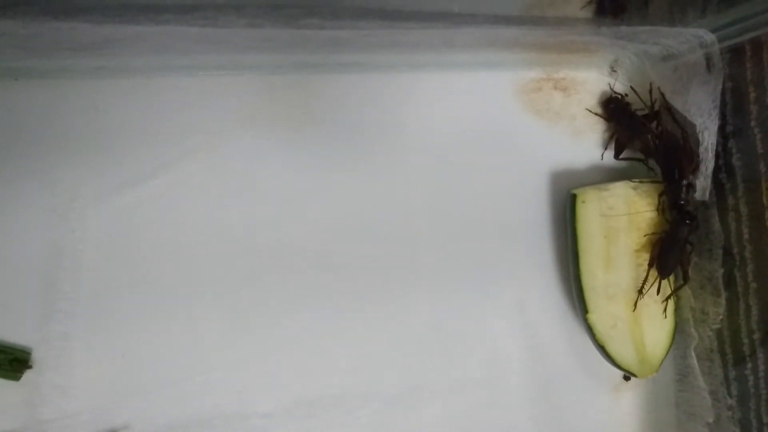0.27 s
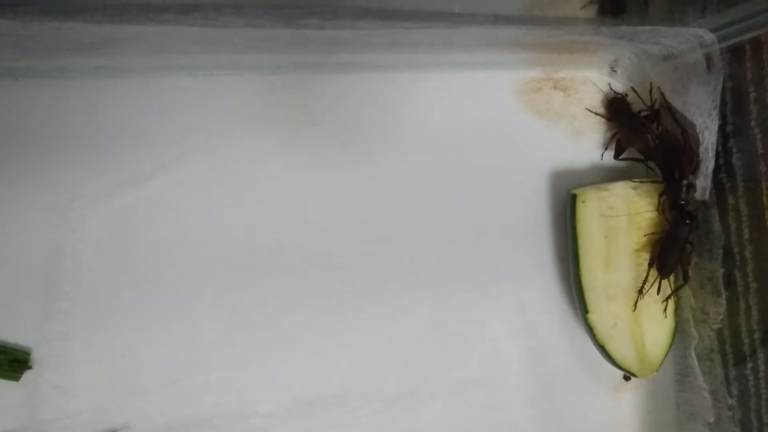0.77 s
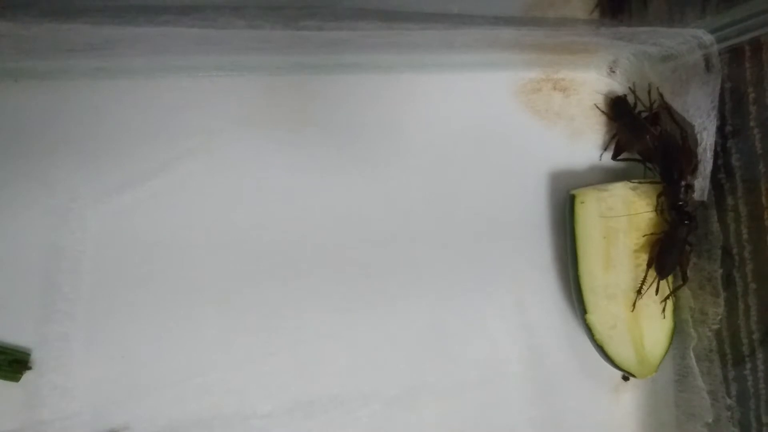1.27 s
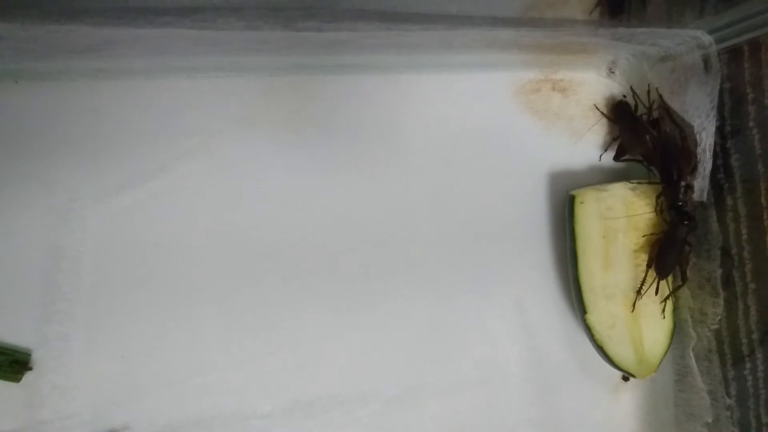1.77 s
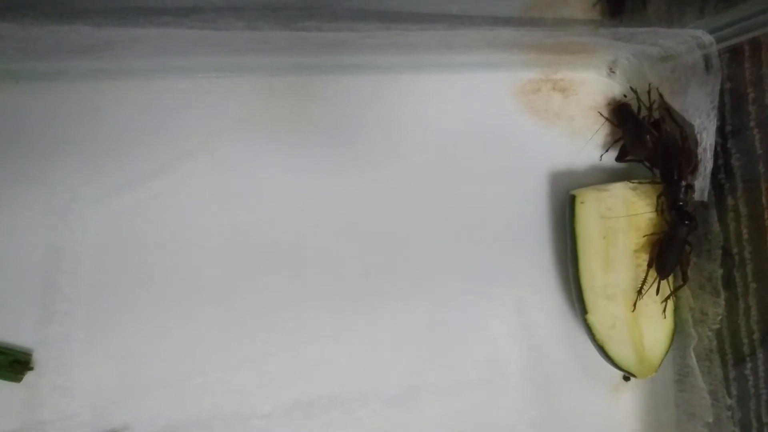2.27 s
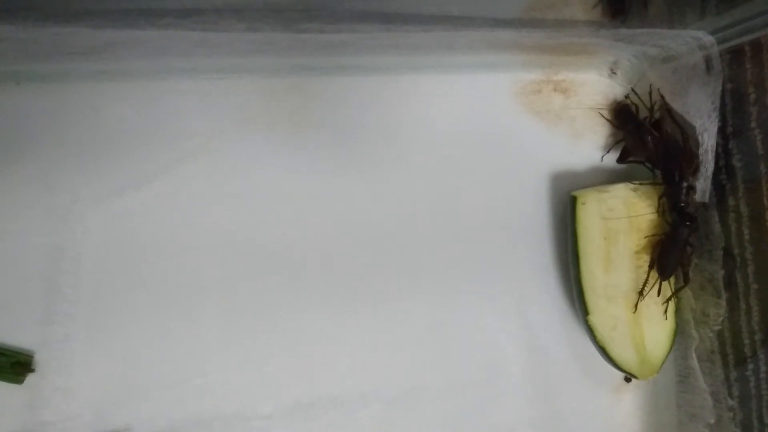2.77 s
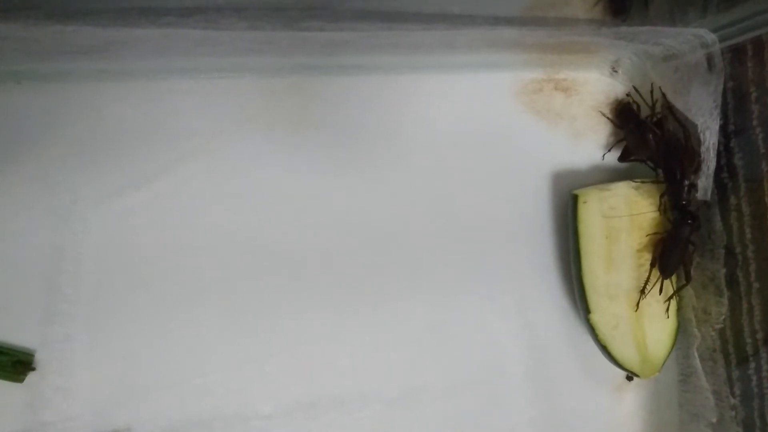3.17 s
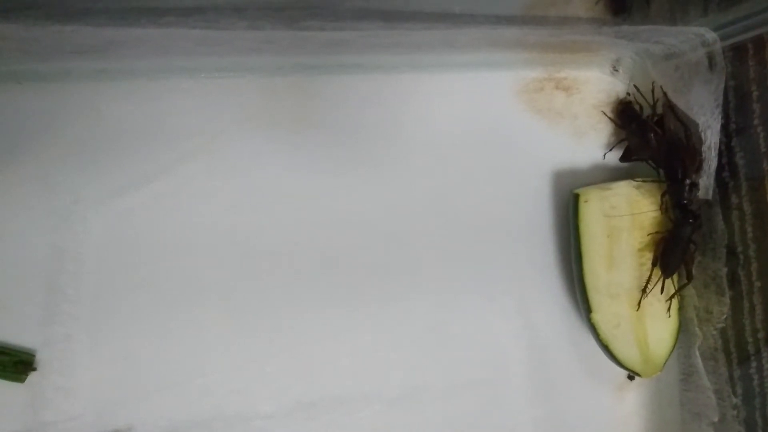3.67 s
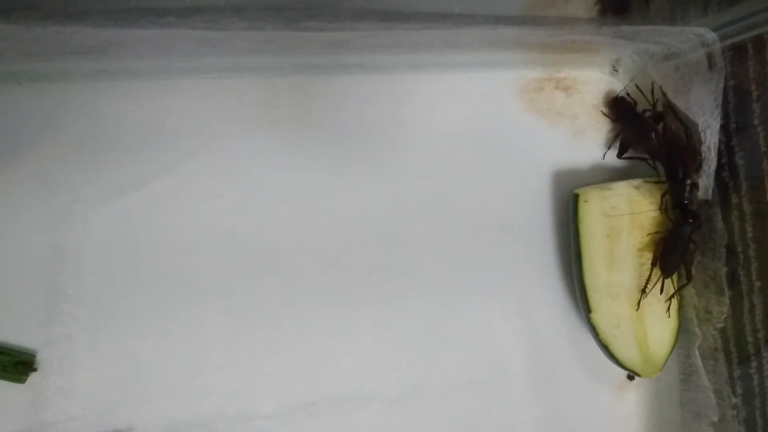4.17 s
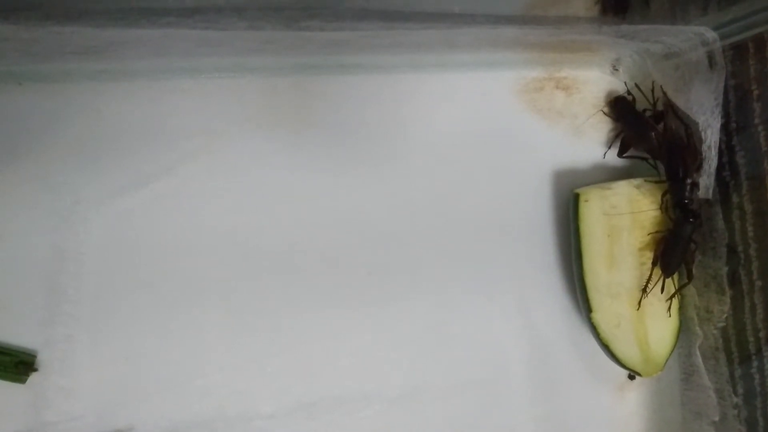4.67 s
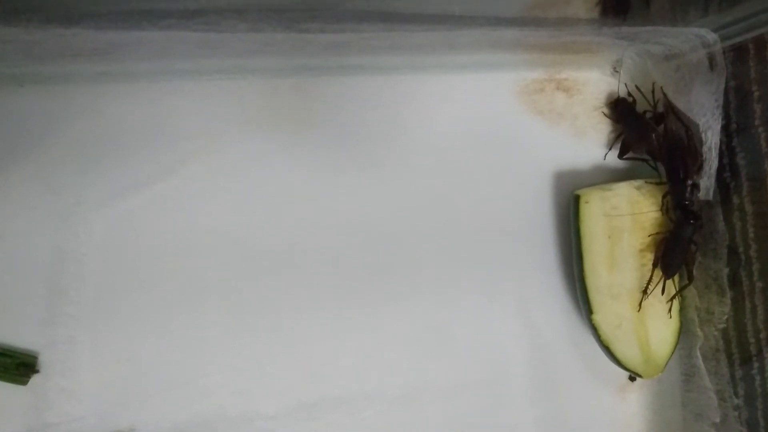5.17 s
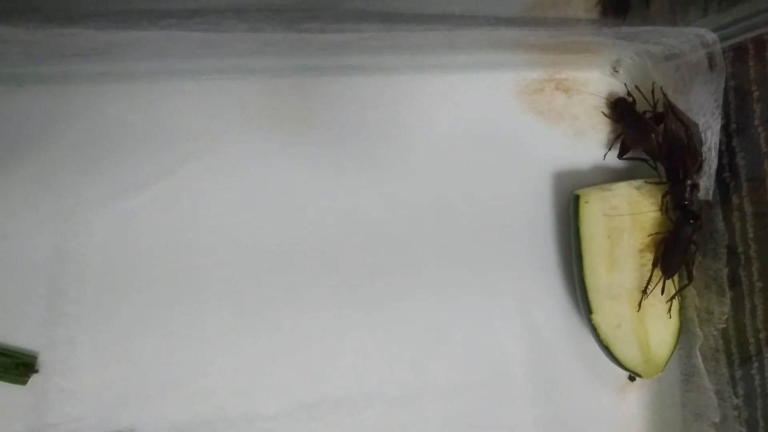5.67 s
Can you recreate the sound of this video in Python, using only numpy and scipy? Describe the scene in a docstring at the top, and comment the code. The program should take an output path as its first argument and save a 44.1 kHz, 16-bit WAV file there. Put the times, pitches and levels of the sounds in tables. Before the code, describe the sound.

Close, high cricket chirps grow louder and run into a rapid raspy trill, then build again, with a low room hum behind.

```python
"""Cricket in a plastic box

A male cricket, close up in stereo: twice a run of falling chirps swells, then turns into a fast trill.
Each closing stroke of the wings drags a scraper over a file: a near-pure tone, overtones, a dry rasp.
The walls throw the tone back to the microphones and the box rings faintly.
Behind it, a machine hums low in the room."""
import sys
import numpy as np
from scipy import signal
from scipy.fft import rfft, irfft
from scipy.io import wavfile

SR = 44100
rng = np.random.default_rng(int(sys.argv[2]) if len(sys.argv) > 2 else 0)


def to_wav(s):
    """Save 16-bit WAV."""
    ch = np.atleast_2d(s).T  # columns
    pcm = np.round(np.clip(ch, -1, 1) * 32767)  # PCM
    wavfile.write(sys.argv[1], SR, pcm.astype(np.int16))


N = 261513
HZ = np.fft.rfftfreq(N, 1 / SR)

# the machine's hum lines: pitch_hz, level_db
MACHINE_HUM = [(75.4, -64.5), (118.4, -59), (156.1, -57), (193.8, -56), (231.5, -51), (269.2, -61),
               (409.1, -72.5)]
# room tone, low and high: frequency_hz, density_db
ROOM_RUMBLE = [(20, -26), (38, -18.5), (58, -5), (100, -3.5), (160, -1), (235, -1), (290, -5.5), (350, -19),
               (480, -30.5), (800, -39), (1500, -54.5), (4000, -65)]
ROOM_HISS = [(300, -8), (2500, -4.5), (4500, 3.5), (6200, 0.5), (7600, -5), (8800, -1), (10300, -2.5),
             (12500, -2), (13300, -4.5), (13800, 15), (14200, 11.5), (14700, -1), (15700, -17)]

# slow wing strokes: start_s, level_db, length_s, pitch_hz, opening_kick_hz, closing_fall_hz
CHIRP_SCORE = [(.107, -55.5, .042, 3350, 399, 220), (.189, -44.5, .036, 3470, 150, 131),
               (0.268, -39.5, 0.0432, 3600, 567, 341.2), (.352, -36, .048, 3634, 603.5, 318),
               (.431, -32.5, .057, 3644, 417, 261), (0.514, -24, .054, 3770, 148.4, 463),
               (.594, -21, .055, 3923, 59.5, 740.6), (0.678, -19.5, .055, 3915, 296, 718.6),
               (.762, -20, .055, 3880, 150, 659.6), (.845, -18.5, .055, 3900, 100, 697),
               (4.639, -50.5, 0.036, 3380, 297, 254.3), (4.788, -55, .042, 3360, 98.6, 258),
               (4.88, -43.5, .042, 3510, 150.5, 206), (4.964, -43.5, .038, 3495, 254, 227.6),
               (5.045, -38, .048, 3473, 604, 130.4), (5.129, -36, .056, 3522, 605, 121.7),
               (5.211, -29, .057, 3637, 300, 264.6), (5.295, -22.5, .054, 3760, 90, 494.6),
               (5.38, -20.5, .055, 3846, 30, 613), (5.462, -20, .055, 3880, 60, 521),
               (5.542, -18.5, .055, 3885, 294, 665), (5.629, -19, .055, 3950, 60, 760)]
# course of one stroke, stretched to its length: age_s, tone_db, overtones_db, rasp_db, scuff_db
CHIRP_ENVELOPE = [(0, -35.5, -22, -25, -15.5), (.002, -5, -6, -9.5, -4), (.01, -7, 1.5, 1.5, -13),
                  (.02, -2.5, 2, -5.5, -26), (.024, 2, 2, 4.5, 7.5), (.034, 5.5, 2.5, -3, -19.5),
                  (0.044, 2, 4, 1, -20.5), (.049, 4, -0.5, 3, -16.5), (.058, -30, -22, -23, -20.5)]
TRILL_ENVELOPE = [(0, -28, -20, -12, -9.5), (.003, -13.5, -5.5, -4.5, -0.5), (.0085, -1, 1, 4, -8),
                  (.014, 0, 2, -0.5, -25), (.021, 2.5, 2, -9, -18), (0.03, 0.5, 3.5, -2.5, -30),
                  (.033, -11.5, -12, -5.5, -24), (.043, -38.5, -35, -7.5, -21.5)]
# how the force of a stroke sets its texture: tone_db, rasp_db, overtones_db, judder_rad
CHIRP_TEXTURE = [(-59, -59.5, -63, 0.16), (-43.5, -52.5, -57.5, .15), (-30, -55.5, -48.5, .08),
                 (-22.5, -47.5, -45.5, .13), (-14.5, -44.5, -47.5, .2)]
TRILL_TEXTURE = [(-40.5, -50.5, -59, .12), (-29, -47.5, -52.5, 0.058), (-22.5, -45.5, -42, .025)]
# wing resonances colouring the overtones at each microphone: frequency_hz, gain_db
OVERTONE_COLOUR_LEFT = [(6000, 8.5), (6700, 0), (7000, 4.5), (7400, 0), (8000, -3), (9900, -14.5),
                        (10400, -17), (11300, -11), (12200, -13), (13500, -2), (13900, -12.5), (14800, -12),
                        (15700, -18.5)]
OVERTONE_COLOUR_RIGHT = [(6000, -8.5), (6900, -26.5), (7400, -17.5), (8000, -23), (9900, -7), (10400, -1.5),
                         (10800, -1.5), (11400, -8), (12200, -12.5), (13600, -3), (13950, -11),
                         (14800, -14), (15700, -16)]
# the rasp at each microphone: frequency_hz, density_db
RASP_COLOUR_LEFT = [(1800, -13.5), (2700, -10.5), (3350, 12), (4200, 1.5), (5100, -3), (6200, -2.5),
                    (7300, 0.5), (8200, -23), (9200, -15.5), (10000, -7.5), (11800, -17), (13700, -3.5),
                    (14500, -20.5), (15700, -27)]
RASP_COLOUR_RIGHT = [(1800, -30), (2700, -9.5), (3350, 8.5), (4200, -2), (5100, -4.5), (6200, -11.5),
                     (6900, 4.5), (7800, -27), (9200, -31), (10500, -6), (11800, -11.5), (13700, 2.5),
                     (14500, -22), (15700, -36)]
# narrow wing resonances that give the rasp a ticking pitch: pitch_hz, width_hz, gain_db
WING_MODES = [(4954, 137, 8), (5480, 130, 0)]
# the scraper landing on the file: frequency_hz, density_db
SCUFF_COLOUR = [(6000, -28), (7600, -9), (8400, -1.5), (9200, 5.5), (9800, -8), (11000, -14), (13300, -0.5),
                (14500, -37.5)]
# the scraper snagging on the file: start_s, level_db, relative_scuff_db, ring_hz
SNAG_SCORE = [(0.1363, -59.0, -19, 5520), (0.2109, -43.0, -22, 5180), (0.3, -40.5, -16, 4160),
              (0.7831, -47, -18, 4160), (0.8652, -40, -25, 4160), (0.976, -41, -18, 4160),
              (1.059, -51, -32, 5000), (1.184, -41, -26, 5420), (1.3107, -41, -21, 4960),
              (1.3561, -36.5, -25, 4160), (1.692, -50, -10, 4980), (1.7299, -43, -10, 5560),
              (1.77, -38, -16, 5510), (2.527, -52, -7, 4950), (2.7004, -48.0, -8, 4160),
              (2.785, -48.5, -16, 5240), (2.825, -40.0, -14, 5510), (3.2105, -46.0, -17, 5000),
              (4.1045, -39.5, -17, 5280), (4.141, -38.0, -26, 4170), (4.1824, -47, -11, 5770),
              (4.2188, -38.0, -17, 5510), (4.3014, -37.5, -17, 5290), (4.339, -41, -29, 4160),
              (4.3783, -47, -8, 4320), (4.425, -41, -26, 4960), (4.605, -42.5, -11, 5280),
              (5.0056, -43.5, -18, 4300)]
# broad noise of a snag, under its ring: frequency_hz, density_db
SNAG_COLOUR = [(2000, -38.5), (3200, -9.5), (4100, -4), (5500, 4), (6400, 0), (9000, -33)]

# low modes of the box: pitch_hz, width_hz, level_db
BOX_RESONANCES = [(832, 3.8, -1.5), (923, 43, -5.5), (1035.6, 5.8, 3.5)]
# broad noise of the shaken box: frequency_hz, density_db
BOX_COLOUR = [(250, -9), (500, -12), (950, -18), (1200, -23), (1450, -15), (1800, -26), (2400, -22),
              (3200, -29)]
# paths to each microphone, direct first, then off the box walls: delay_s, gain_db
PATHS_LEFT = [(.000062, 0), (.004033, -15.5), (.006482, -13.5), (.009095, -11), (.011733, -11.5),
              (.018343, -16.5), (.024159, -16.5), (.031631, -19)]
PATHS_RIGHT = [(0, -5), (.001192, -8), (.003634, -8.5), (.00521, -10), (.006864, -11), (.014405, -21.5),
               (.016002, -22), (.024596, -23)]

# pace of the wings, one curve a trill: time_s, strokes_so_far
TRILL_PACE = [
    [(.934, 0), (1.012, 2), (1.133, 5), (2.184, 30), (2.82, 45), (3.028, 50), (3.828, 69)],
    [(4.068, 0), (4.136, 2), (4.174, 3), (4.294, 6), (4.42, 9), (4.588, 13)],
    [(5.711, 0), (5.748, 1), (5.787, 2), (5.908, 5)],
]
# wing force and scraper grip (firmer is higher, brighter, less raspy): time_s, tone_db, grip_db
TRILL_PRESSURE = [(0.932, -30.5, 0), (1.049, -26.5, -0.5), (1.4, -24.5, 1), (1.55, -25, -1.5),
                  (2.001, -24.5, -1.5), (2.401, -25, -1), (2.82, -25.5, -1.5), (2.871, -25, 2),
                  (2.989, -24, 1.5), (3.079, -25.5, -2.5), (3.45, -25.5, -2), (3.679, -26, -1.5),
                  (3.789, -26, -3.5), (3.83, -28, -4.5), (4.07, -43, 0.5), (4.17, -31, 2),
                  (4.32, -29.5, -2.5), (4.59, -29.5, -1.5), (5.749, -29.5, -1.5), (5.799, -26, 2),
                  (5.91, -26.5, -1)]
# a harder trill stroke is longer and higher: tone_db, length_s, pitch_hz
TRILL_SIZE = [(-41.5, 0.0277, 3425), (-32, .033, 3445), (-26.5, .041, 3455), (-24, .043, 3460)]
# the tooth rate stumbles as the scraper lands, holds, then sags: age_s, pitch_offset_hz
TRILL_BEND = [(0, 60.5), (.003, 20), (.006, -45), (.01, 12), (.02, 16), (.026, 3), (.03, -35), (.034, -130),
              (.043, -240)]


def amp(db):
    """Decibels to gain."""
    return 10 ** (np.asarray(db) / 20)


def unit(x):
    """Scales to rms 1."""
    return x / np.sqrt(np.mean(x ** 2) + 1e-20)


def colour(points):
    """Gain at every frequency from a short spectrum."""
    hz, db = np.transpose(points)
    return amp(np.interp(np.log(HZ + 1), np.log(hz), db))


def resonances(modes):
    """Complex gain of a set of modes at every frequency."""
    return sum(amp(db) / (1 + 2j * (HZ - hz) / width) for hz, width, db in modes)


def filtered(x, gain):
    """Applies a gain at every frequency."""
    return irfft(rfft(x) * gain, N)


def noise(gain, likeness):
    """Coloured stereo noise; likeness is the correlation between the microphones."""
    left, other = rng.standard_normal((2, N))
    right = likeness * left + np.sqrt(1 - likeness ** 2) * other
    return unit(filtered([left, right], gain))


def wander(rate_hz):
    """A smooth random curve of rms 1, rolling off above the rate."""
    return unit(filtered(rng.standard_normal(N), 1 / (1 + (HZ / rate_hz) ** 4)))


def pan(left_db):
    """Channel gains for a left-right level difference."""
    return amp([[left_db / 2], [-left_db / 2]])


def room_tone(waver_db=1.1, waver_turns=0.093):
    """Off to the left, a machine's hum wavers in a low rumble; a faint hiss lies all round."""
    t = np.arange(N) / SR
    hum = 0
    for hz, db in MACHINE_HUM:
        level = amp(db + waver_db * wander(1.7))
        turns = hz * t + rng.random() + waver_turns * wander(1.2)
        hum += level * np.sin(2 * np.pi * turns)
    low = np.sqrt(2) * amp(-1) * hum + amp(-48.5) * noise(colour(ROOM_RUMBLE), likeness=0.71)
    return pan(6.85) * low + amp(-66) * noise(colour(ROOM_HISS), likeness=0.12)


def chirp_strokes(kick_s=0.0055, fall_power=1.5):
    """The scraper kicks off high, then slows ever faster. Yields start_s, tone_db, grip_db, pitch_hz."""
    for start, db, length, pitch, kick, fall in CHIRP_SCORE:
        t = np.arange(0, length, 1 / SR)
        yield start, db, 0, pitch + kick * np.exp(-t / kick_s) - fall * (t / length) ** fall_power


def wing_motion(rasp_cut_per_grip=0.39):
    """Force and grip set each stroke's tooth rate, judder, tone, bite (overtones), rasp and scuff."""
    tooth_hz = np.full(N, 3400.)
    tone, bite, judder, rasp, scuff = np.zeros((5, N))
    for strokes, texture, envelope in ((chirp_strokes(), CHIRP_TEXTURE, CHIRP_ENVELOPE),
                                       (trill_strokes(), TRILL_TEXTURE, TRILL_ENVELOPE)):
        force, *effects = np.transpose(texture)
        age, *levels = np.transpose(envelope)
        for start, tone_db, grip_db, pitch in strokes:
            rasp_db, overtones_db, judder_rad = (np.interp(tone_db, force, e) for e in effects)
            first = round(start * SR)
            span = np.arange(first, min(first + len(pitch), N))
            t = np.linspace(0, age[-1], len(pitch))[:len(span)]
            swell_db, bite_db, scrape_db, scuff_db = (np.interp(t, age, db) for db in levels)
            fade = signal.windows.tukey(len(t), .04)
            friction = fade * amp(rasp_db - rasp_cut_per_grip * grip_db)
            tooth_hz[span], judder[span] = pitch[:len(span)], judder_rad
            tone[span] += fade * amp(tone_db + swell_db)
            bite[span] += fade * amp(overtones_db + grip_db + bite_db)
            rasp[span] += friction * amp(scrape_db)
            scuff[span] += friction * amp(scuff_db)
    return tooth_hz, tone, bite, judder, rasp, scuff


def wing_tone(tooth_hz, tone, bite, judder, rasp, drift_hz=6, slip_hz=130, shimmer_db=0.98):
    """The wing rings at the tooth rate; a lightly pressed scraper slips and roughens the note."""
    slipping = rasp / (rasp + tone + 1e-9)
    hz = tooth_hz + drift_hz * wander(68) + slip_hz * slipping * wander(730)
    phase = 2 * np.pi * np.cumsum(hz) / SR
    note = np.sqrt(2) * tone * amp(shimmer_db * wander(161)) * np.sin(phase)
    overtones = 0
    for harmonic in (2, 3, 4):  # judder makes these scratchy
        flicker_db = 18 * judder * wander(200) + 2.9 * wander(25)
        overtones += amp(flicker_db) * np.sin(harmonic * (phase + judder * wander(350)))
    at_mics = [colour(OVERTONE_COLOUR_LEFT), colour(OVERTONE_COLOUR_RIGHT)]
    return note, filtered(np.sqrt(2) * bite * overtones, at_mics)


def wing_rasp(rasp, grain_db=6, evenness=0.51):
    """Teeth that catch unevenly give a grainy scrape; no catch is much harder than the rest."""
    grains = unit(amp(grain_db * np.tanh(evenness * wander(500)) / evenness))
    scrape = rasp * grains * noise(1, likeness=0.37)
    ring = 1 + resonances(WING_MODES)
    at_mics = np.array([colour(RASP_COLOUR_LEFT), colour(RASP_COLOUR_RIGHT)]) * ring
    return filtered(scrape, unit(at_mics))


def wing_scratches(scuff, rise_s=0.0016, t60_s=0.034, scuff_lead_s=0.003, ring_width_hz=130):
    """Each stroke lands with a bright scuff; now and then the scraper snags and the wing rings."""
    t = np.arange(N) / SR
    snags, snag_scuffs = np.zeros((2, N))

    def burst(start):
        return np.clip((t - start) / rise_s, 0, 1) * amp(-60 * abs(t - start) / t60_s)

    for start, db, scuff_db, _ in SNAG_SCORE:
        snags += amp(db) * burst(start)
        snag_scuffs += amp(db + scuff_db) * burst(start - scuff_lead_s)
    landing = amp(-7) * scuff + amp(3) * snag_scuffs
    starts, _, _, ring_hz = np.transpose(SNAG_SCORE)
    latest_snag = np.searchsorted(starts, t) - 1
    phase = 2 * np.pi * np.cumsum(ring_hz[latest_snag]) / SR
    ring = wander(ring_width_hz) * np.cos(phase) + wander(ring_width_hz) * np.sin(phase)
    teeth = unit(amp(4 * np.tanh(wander(530)))) * noise(1, likeness=0.48)
    ticks = amp(-7) * filtered(snags * teeth, unit(colour(SNAG_COLOUR))) + amp(-4) * snags * ring
    scuffs = filtered(landing * teeth, unit(colour(SCUFF_COLOUR)))
    return pan(2.7) * ticks + pan(14.8) * scuffs


def box_ring(rasp, linger_s=0.057):
    """The scraping shakes the box, whose low modes ring on from stroke to stroke."""
    pole = np.exp(-1 / (linger_s * SR))
    shake = np.sqrt(signal.lfilter([1 - pole], [1, -pole], rasp ** 2))
    modes = amp(-20) * pan(9) * noise(abs(resonances(BOX_RESONANCES)), likeness=0.28)
    wash = amp(-12) * noise(colour(BOX_COLOUR), likeness=0.098)
    return shake * (modes + wash)


def box_walls(note):
    """Near reflections join the direct note at each microphone and beat against its glide."""
    paths = [sum(amp(db) * np.exp(-2j * np.pi * HZ * delay) for delay, db in mic)
             for mic in (PATHS_LEFT, PATHS_RIGHT)]
    response = irfft(paths, N)[:, :SR // 20]
    return signal.oaconvolve(note[None], response, axes=1)[:, :N]


def diffuse_tail(x, t60_s):
    """A short reverberation, different at each microphone."""
    t = np.arange(SR // 3) / SR
    taps = rng.standard_normal((2, len(t))) * amp(-60 * t / t60_s) * (t > .002)
    taps /= np.linalg.norm(taps, axis=1, keepdims=True)
    return signal.oaconvolve(x, taps, axes=1)[:, :N]


def trill_strokes(jitter_s=0.00059, grip_jitter_db=0.77, lift_hz_per_db=6.5):
    """The wings set out fast and settle to an even beat. Yields start_s, tone_db, grip_db, pitch_hz."""
    when, force, grip = np.transpose(TRILL_PRESSURE)
    level, *sizes = np.transpose(TRILL_SIZE)
    age, glide = np.transpose(TRILL_BEND)
    for pace in TRILL_PACE:
        marks, count = np.transpose(pace)
        starts = np.interp(np.arange(count[-1] + 1), count, marks)
        for start, (late, firmer) in zip(starts, rng.standard_normal((len(starts), 2))):
            tone_db = np.interp(start, when, force)
            grip_db = np.interp(start, when, grip) + grip_jitter_db * firmer
            length, pitch = (np.interp(tone_db, level, size) for size in sizes)
            bend = np.interp(np.linspace(0, age[-1], round(length * SR)), age, glide)
            yield start + jitter_s * late, tone_db, grip_db, pitch + lift_hz_per_db * grip_db + bend


def click(start_s=4.793, pitch_hz=10300, width_hz=520, level_db=-51.5, t60_s=0.15):
    """One short, bright tick early in the second run of chirps."""
    age = np.arange(N) / SR - start_s
    band = 1 / (1 + (2 * (HZ - pitch_hz) / width_hz) ** 2)
    return (age > 0) * amp(level_db - 60 * abs(age) / t60_s) * noise(band, likeness=0.35)


def scene():
    """The cricket close by in its box, the room behind."""
    tooth_hz, tone, bite, judder, rasp, scuff = wing_motion()
    note, overtones = wing_tone(tooth_hz, tone, bite, judder, rasp)
    song = amp(-2.5) * box_walls(note)
    shine = amp(-4.5) * overtones
    scrape = amp(-2) * wing_rasp(rasp) + wing_scratches(scuff) + click()
    reverb = amp(-10) * diffuse_tail(song, t60_s=0.073)
    reverb += diffuse_tail(amp(1.5) * scrape + amp(-6.5) * shine, t60_s=0.1)
    return song + shine + scrape + reverb + box_ring(rasp) + room_tone()


def record(dry):
    """Both microphone channels are cut off steeply at the top of the treble."""
    edge_hz = 15750
    lowpass = signal.firwin(511, edge_hz, window=("kaiser", 9), fs=SR)
    return signal.oaconvolve(dry, lowpass[None], "same")


dry = scene()
out = record(dry)
to_wav(out)
```